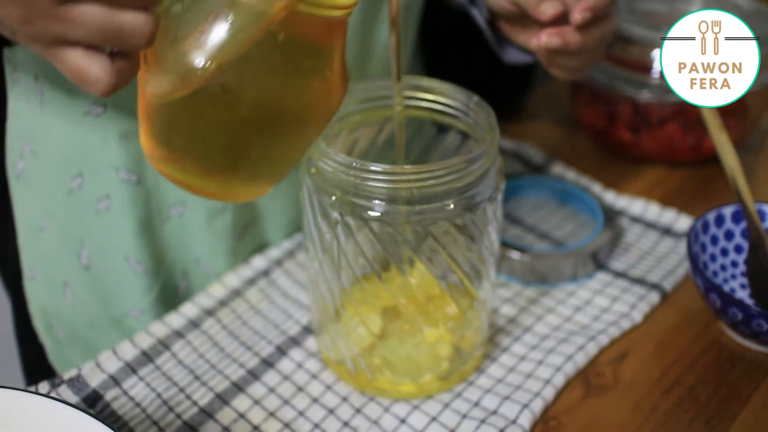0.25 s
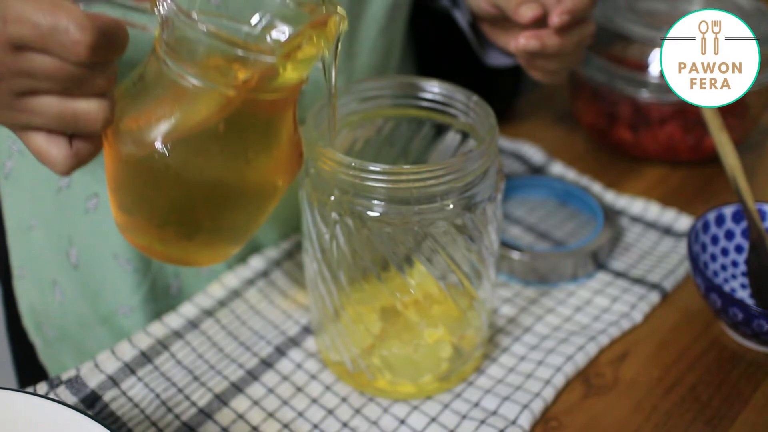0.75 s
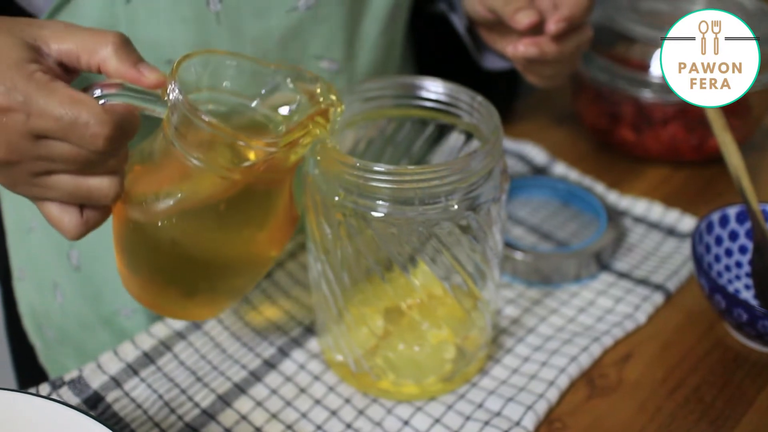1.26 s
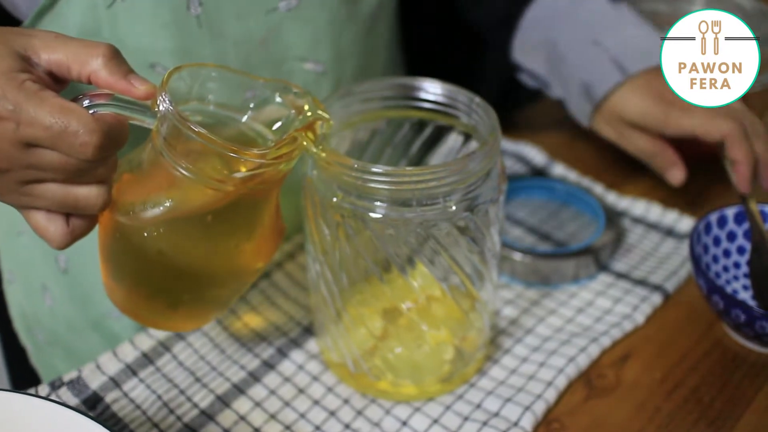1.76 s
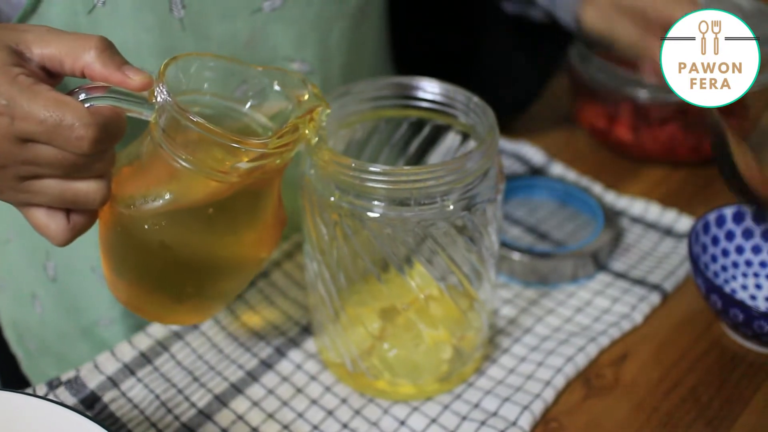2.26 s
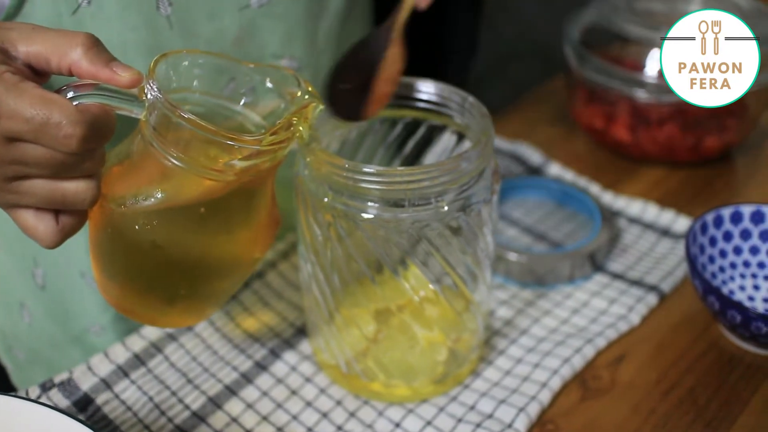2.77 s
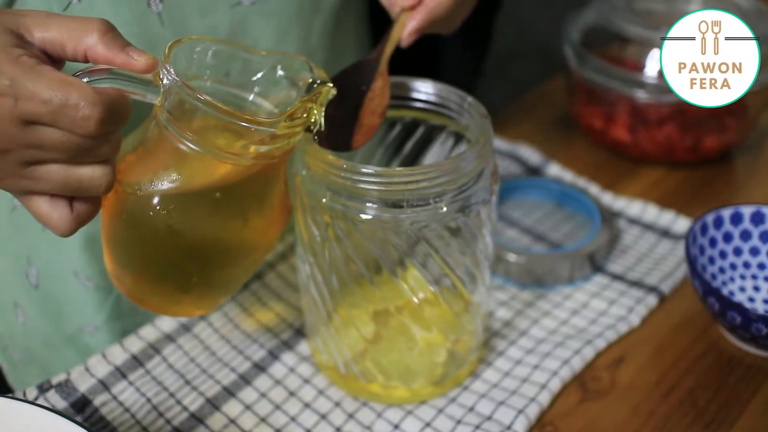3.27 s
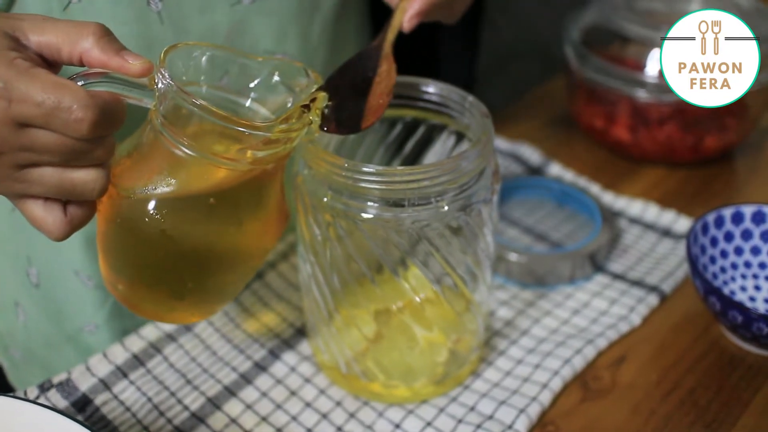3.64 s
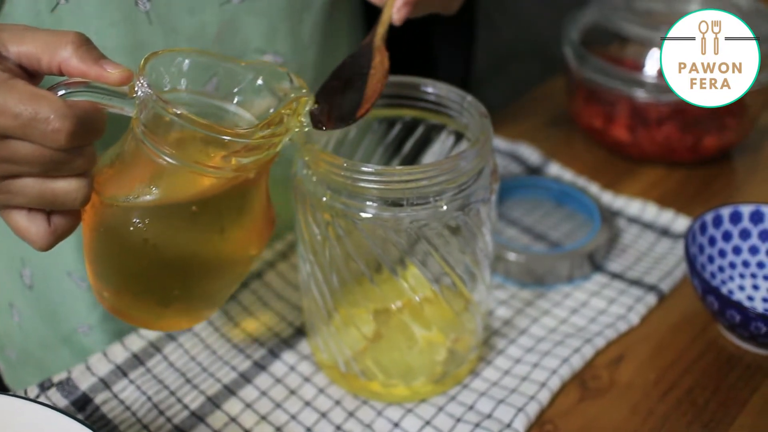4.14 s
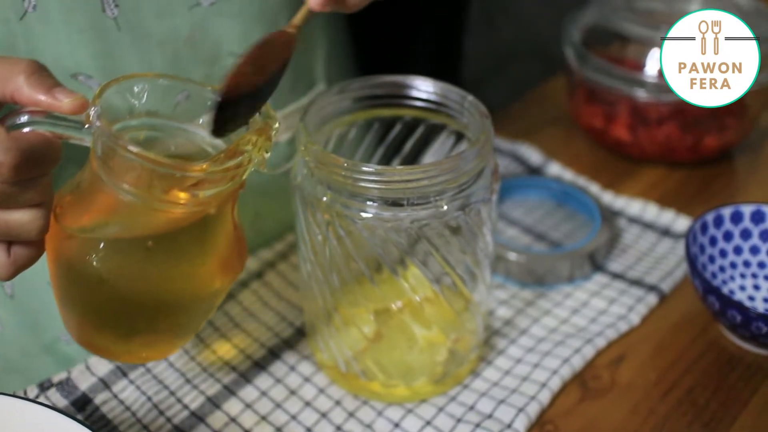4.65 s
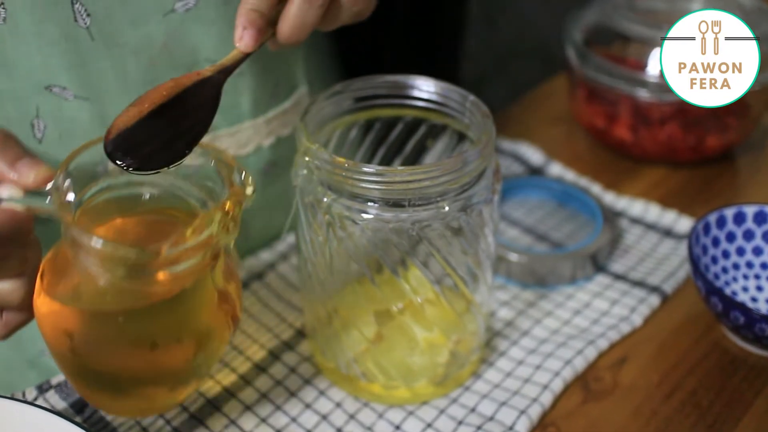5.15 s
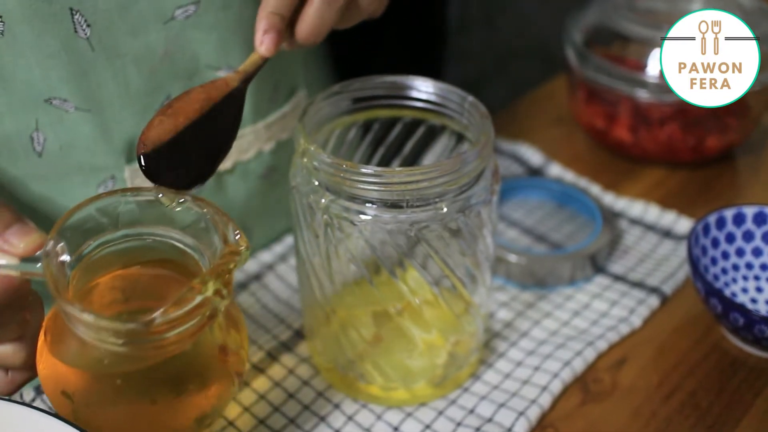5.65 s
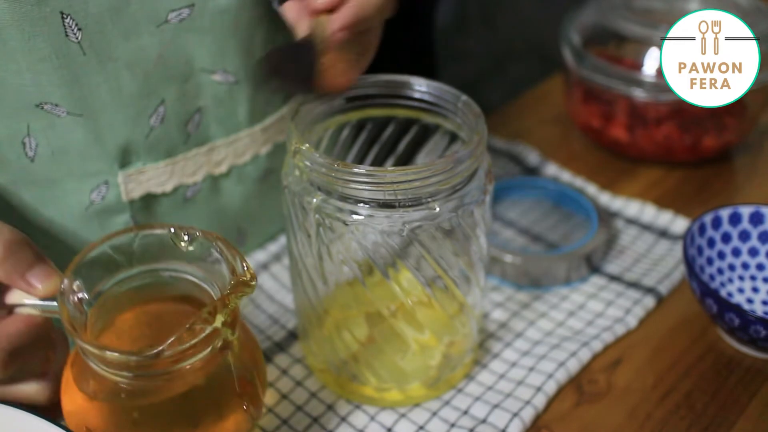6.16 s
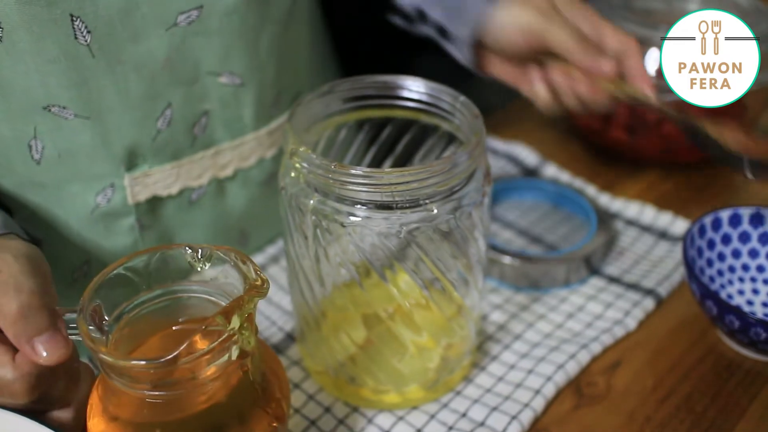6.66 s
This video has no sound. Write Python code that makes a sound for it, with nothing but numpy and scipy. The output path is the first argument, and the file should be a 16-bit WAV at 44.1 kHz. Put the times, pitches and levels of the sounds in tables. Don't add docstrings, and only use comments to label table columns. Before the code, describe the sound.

A glass jug clinks several times on a glass jar's rim, then a wooden spoon taps bowl, jar and lip in a quietly humming kitchen.

```python
import sys
import numpy as np
from scipy import signal
from scipy.fft import rfft, irfft
from scipy.io import wavfile

SR = 44100
rng = np.random.default_rng(int(sys.argv[2]) if len(sys.argv) > 2 else 0)


def unload_audio(sound):
    columns = np.transpose(np.atleast_2d(sound))
    steps = np.round(np.clip(columns, -1, 1) * 32767)
    wavfile.write(sys.argv[1], SR, steps.astype(np.int16))


def invert_db(level):
    return 10 ** (np.asarray(level, dtype=float) / 20)


N = 304730
T = np.arange(N) / SR

# start_s, crack_db, table_db, jar_air_db, jar_wall_db
JUG_KNOCKS = [
    (0.2754, -21, -46, -36.5, -53.5),
    (0.354, -33, -53, -47, -69),
    (0.46, -23.5, -38, -34, -65),
    (0.9372, -16, -50, -38.5, -38.5),
    (.949, -20.5, -57, -44.5, -58),
    (1.253, -25, -51, -41, -61.5),
    (1.536, -33, -82, -55, -76),
]
# pitch_hz, level_db, t60_s
TABLE_MODES = [(248.3, -4, 0.52), (352, -13, 0.57), (251.7, -11.5, 0.65), (318, -15, 0.024)]
# pitch_hz, level_db, t60_s
JAR_AIR_MODES = [(438.6, 1.5, 0.17), (382, -7.5, 0.22), (547, -23.5, 0.45), (613, -10, 0.11),
                 (376, -7, 0.12)]
# pitch_hz, level_db, t60_s
JAR_WALL_MODES = [(3266, 3, .26), (3290, 2, .09), (4588, -5, .15), (5571, -3, .27), (5603, -8, .24),
                  (5537, -8, .16), (2030, -2, .2), (4030, -8, .1), (6476, -14, .15), (2120, -4, .08),
                  (2400, -8, .05)]
# pitch_hz, level_db, t60_s
JUG_WALL_MODES = [(2110, -0.5, .08), (2370, -12, 0.054), (2770, -12, 0.065), (4590, -7.5, 0.12),
                  (5595, -15, .14), (6040, -26, 0.072)]
# pitch_hz, level_db per Hz
KNOCK_COLOUR = [(88, -23), (150, -15), (525, -2), (1280, -12.5), (1910, -3), (2740, -19), (3250, -14.5),
                (3850, -22.5), (4400, -12.5), (5020, -20), (5630, -15.5), (7070, -23), (14000, -46.5)]

RIM_BLOWS = [
    (.27532, -32, -23, -43, -63),
    (.35474, -45, -43, -145, -97),
    (.46126, -39, -32, 79, -123),
    (.93637, -29, -29, -94, -20),
    (.9492, -27, -28, 77, 141),
    (1.2522, -47, -37, 55, -42),
    (1.53674, -66, -60, -108, -144),
    (2.47101, -36.5, -46, 50, 15),
    (2.83785, -48, -62, 86, -165),
]
# pitch_hz, t60_s
RIM_TWINS = [(1775.5, .44), (1784.3, .354), (1803.3, .204), (1822, .144)]
# pitch_hz, t60_s
FREE_JAR_TWINS = [(1770.6, .4), (1785.2, .36)]

# start_s, crack_db, ring_db
BOWL_BLOWS = [
    (2.0252, -16, -38.5),
]
# pitch_hz, level_db, t60_s
BOWL_MODES = [(1567, -9, .6), (1581, -10, .45), (3009, 0, .64), (5013.6, -9, .36), (7504, -7, .09),
              (4200, -12, .15), (5890, -20, .3), (253, -14, .35), (668, -5, .18), (546, -12, .3),
              (572, -11, .3), (1107, -9, .18), (915, -14, .3), (1290, -12, .2)]
# pitch_hz, level_db per Hz
BOWL_COLOUR = [(88, -49), (150, -8.5), (1330, 7.5), (1800, 1), (2400, -15), (3010, -4.5), (4230, 1.5),
               (5420, -22), (5850, -4), (6940, -17), (7630, -6.5), (10100, -23), (14000, -44)]

# start_s, crack_db, ring_db
HARD_TAPS = [
    (2.4708, -10.5, -34.5),
]
# start_s, crack_db, ring_db
SOFT_TAPS = [
    (2.8380, -23.5, -56),
]
# pitch_hz, level_db, t60_s
TAP_MODES = [(4564, 0, .12), (4594, -6, .11), (4516, -11, .16), (6842, -8, .25), (6805, -11, .15),
             (5534, -16, .2), (3500, -8, .1), (3800, -8, .12), (7250, -8, .1)]
# pitch_hz, level_db per Hz
HARD_TAP_COLOUR = [(120, -85), (200, -19.5), (1330, -8), (1880, -7), (2600, -21.5), (3300, 0), (4410, 0.5),
                   (4750, -9), (5110, -19), (7090, 2.5), (8500, -10), (10000, -27), (11800, -25),
                   (15500, -51)]
# pitch_hz, level_db per Hz
SOFT_TAP_COLOUR = [(120, -53), (200, -9), (1670, -1.5), (2700, -14), (3050, -13), (3320, 7.5), (3740, -7),
                   (4370, 1.5), (6050, -10), (7560, -9), (10100, -43), (12000, -32), (15600, -62),
                   (22000, -120)]

# start_s, crack_db, ring_db
LIP_BLOWS = [
    (4.8883, -23.5, -30),
    (5.08, -53, -53),
]
# pitch_hz, level_db, t60_s
SPOON_MODES = [(1220, 2.5, 0.013), (1970, -15, 0.0081), (1260, -36, 0.45), (1420, -30, .12),
               (1130, -30, .2), (4270, -14, 0.0047)]
# pitch_hz, level_db per Hz
LIP_COLOUR = [(180, -39), (300, -40), (1220, -2), (3380, -25), (4400, -19.5), (5130, -35), (6470, -30),
              (12000, -44), (15600, -73), (22000, -120)]

# start_s, crack_db, ring_db
DISH_BLOWS = [
    (5.7197, -18.5, -36.5),
    (5.7475, -31, -74),
]
# pitch_hz, level_db, t60_s
DISH_MODES = [(1434, -1, .38), (1441, -2, .25), (2537, 1, .2), (2552, -7, .17), (3892, 3, .16),
              (5444, -11, .2), (7241, -18, .1), (106, -14, .3), (187, -8, .46), (207, -5, .24),
              (236, -2, .12), (267, -5, .13), (609, -2, .2), (623, -4, .15), (960, -2, .04),
              (8880, -14, .05)]
# pitch_hz, level_db per Hz
DISH_COLOUR = [(59, -45), (100, -3), (819, 8.5), (2060, -2), (2620, 4), (3260, -10), (3910, -9),
               (4500, -40), (5390, -8.5), (8200, -17), (8890, -16), (12000, -32), (15600, -74),
               (22000, -120)]

# start_s, level_db, pitch_hz, t60_s
TABLE_THUMPS = [
    (0.501, -57, 57, 0.44),
    (.94, -51, 63.6, 0.46),
    (2.70, -57, 60, 0.24),
    (6.44, -55.5, 53.6, 0.48),
]
# pitch_hz, t60_s
ECHO_T60 = [(100, 0.38), (500, 0.34), (2000, 0.31), (6000, 0.34), (12000, 0.27)]
# peak_s, level_db, time to fade by 20 dB fade_s (negative = still growing)
MOTOR_SURGES = [(.03, -60, 0.1), (.17, -57, .5), (.5, -68, 0.4), (.82, -60, 0.27), (1.22, -58.5, .5),
                (1.45, -67, 0.1), (1.7, -73, 1), (2.35, -63, 0), (2.55, -63.5, .5), (2.72, -69.5, .5),
                (3.12, -69.5, 0.6), (3.48, -67, .5), (4.06, -58, 0.46), (4.52, -67.5, 0.8),
                (4.97, -66, 0.05), (5.33, -70, 0.4), (6.83, -66.5, -4)]
# pitch_hz, level_db per Hz
HISS_MID_COLOUR = [(12, -25), (20, -0.5), (55, -2), (76, -5), (104, -2), (186, -9), (290, -8.5),
                   (394, -11.5), (688, -11.5), (1050, -14), (2930, -16.5), (14300, -17.5), (15600, -19)]
# pitch_hz, level_db per Hz
HISS_SIDE_COLOUR = [(12, -41), (20, 1), (106, -0.5), (728, -3), (1310, -3.5), (1590, -3.5), (2220, -3.5),
                    (2850, -3), (15600, -5)]

RING_TO_ROOM_DB = -13.5


def rms_one(x):
    return x / np.sqrt(np.mean(x ** 2) + 1e-20)


def at_hz(points, hz):
    table_hz, values = np.array(points)[:, 0], np.array(points)[:, 1]
    return np.interp(np.log(hz + 1), np.log(table_hz), values)


def ring(times, levels_db, modes):
    clicks, out = np.full(N, 1e-18), 0
    clicks[np.round(np.array(times) * SR).astype(int)] = invert_db(np.array(levels_db))
    for k, (pitch_hz, level_db, t60_s) in enumerate(modes):
        decay = invert_db(-60 / (t60_s * SR))
        turn = 2 * np.pi * pitch_hz / SR
        strike = [0, invert_db(level_db) * np.sin(turn)]
        resonance = [1, -2 * decay * np.cos(turn), decay * decay]
        out = out + (-1) ** k * signal.lfilter(strike, resonance, clicks)
    return out


def cracks(times, levels_db, colour, firm, spread_s):
    size = 2048
    out, t, bins = np.zeros(N), T[:size], np.arange(size // 2 + 1)
    cepstrum = irfft(np.log(invert_db(at_hz(colour, bins * SR / size))))
    cepstrum[1:size // 2] *= 2
    pulse = rfft(irfft(np.exp(rfft(cepstrum[:size // 2 + 1], size))))
    pulse /= abs(irfft(pulse)).max()
    g = np.clip(firm, 0.72, 0.95)
    give = 1 - np.exp(-t / 0.000067)
    for start_s, level_db in zip(times, levels_db):
        lags = np.round(spread_s * SR * rng.uniform(0.2, 1, (3, 1)))
        delay = np.exp(-2j * np.pi * lags * bins / size)
        scatter = np.prod((g - delay) / (1 - g * delay), axis=0)
        i = round(start_s * SR)
        out[i:i + size] += invert_db(level_db) * irfft(pulse * scatter) * give
    return out


def struck(blows, modes, colour, firm, spread_s, wet_db):
    start_s, crack_db, ring_db = np.transpose(blows)
    crack = cracks(start_s, crack_db, colour, firm, spread_s)
    body = ring(start_s, ring_db, modes)
    return crack + body, invert_db(wet_db) * crack + invert_db(RING_TO_ROOM_DB) * body


def jug_on_jar():
    start_s, crack_db, table_db, air_db, wall_db = np.transpose(JUG_KNOCKS)
    body = ring(start_s, table_db, TABLE_MODES)
    body = body + ring(start_s, air_db, JAR_AIR_MODES)
    body = body + ring(start_s, wall_db, JAR_WALL_MODES)
    body = body + ring(start_s, air_db - 8, JUG_WALL_MODES)
    crack = cracks(start_s, crack_db, KNOCK_COLOUR, firm=0.78, spread_s=0.0012)
    return crack + body, invert_db(-4.5) * crack + invert_db(RING_TO_ROOM_DB) * body


def glass_rims():
    jug_off_s, swell_s = 2, 0.0015
    out, t = np.zeros(N), T[:SR // 2]
    swell = 1 - np.exp(-t / swell_s)
    for start_s, jar_db, jug_db, jar_deg, jug_deg in RIM_BLOWS:
        modes = RIM_TWINS if start_s < jug_off_s else [*FREE_JAR_TWINS, *RIM_TWINS[2:]]
        twins = np.array([invert_db(-60 * t / t60_s) * np.sin(2 * np.pi * hz * t) for hz, t60_s in modes])
        jar = invert_db(jar_db) * np.exp(1j * np.radians(jar_deg))
        jug = invert_db(jug_db) * np.exp(1j * np.radians(jug_deg))
        shares = np.array([jar.real, jar.imag, jug.real, jug.imag])
        i = round(start_s * SR)
        out[i:i + len(t)] += shares @ twins * swell
    return out


def spoon_leaves_bowl():
    return struck(BOWL_BLOWS, BOWL_MODES, BOWL_COLOUR, firm=0.77, spread_s=0.001, wet_db=-6.5)


def spoon_taps_jar_hard():
    return struck(HARD_TAPS, TAP_MODES, HARD_TAP_COLOUR, firm=0.8, spread_s=0.0012, wet_db=-10.5)


def spoon_taps_jar_lightly():
    return struck(SOFT_TAPS, TAP_MODES, SOFT_TAP_COLOUR, firm=0.62, spread_s=0.0008, wet_db=-15)


def spoon_on_lip():
    return struck(LIP_BLOWS, SPOON_MODES, LIP_COLOUR, firm=0.93, spread_s=0.0005, wet_db=-18)


def dish_set_down():
    return struck(DISH_BLOWS, DISH_MODES, DISH_COLOUR, firm=0.62, spread_s=0.0011, wet_db=-6.5)


def table_thumps():
    return sum(ring([start_s], [level_db], [(pitch_hz, 0, t60_s)])
               for start_s, level_db, pitch_hz, t60_s in TABLE_THUMPS)


def kitchen(x):
    first_echo_s = 0.0052
    t, out = T[:SR * 3 // 4], 0
    onset = np.clip((t - first_echo_s) / 0.0012, 0, 1)
    for low_hz in 60 * 2. ** np.arange(8):
        white = rng.standard_normal((2, len(t))) * onset
        octave = signal.butter(2, [low_hz, 2 * low_hz], "band", fs=SR, output="sos")
        band = signal.sosfilt(octave, white)
        out = out + band * invert_db(-60 * t / at_hz(ECHO_T60, 0.66 * low_hz))
    out = out / np.sqrt(np.sum(out[0] ** 2))
    return signal.fftconvolve(x[None], out, axes=1)[:, :N]


def motor_hum():
    motor_hz, rise_s, waver_hz, waver_rad = 98.8, 0.13, 3.2, 0.8
    peak_s, level_db, fade_s = np.transpose(MOTOR_SURGES)[:, :, None]
    t = T[::64]
    drop = np.maximum((peak_s - t) / rise_s, (t - peak_s) / fade_s)
    level = np.sum(invert_db(level_db - 20 * drop), axis=0)
    slow = signal.butter(2, waver_hz, fs=SR / 64, output="sos")
    waver = rms_one(signal.sosfilt(slow, rng.standard_normal(len(t))))
    phase = 2 * np.pi * motor_hz * T + waver_rad * np.interp(T, t, waver)
    return np.sqrt(2) * np.interp(T, t, level) * np.sin(phase)


def hiss(colour):
    hz = np.arange(N // 2 + 1) * SR / N
    gain = invert_db(at_hz(colour, np.minimum(hz, 15000))) * (hz < 15770)
    return rms_one(irfft(rfft(rng.standard_normal(N)) * gain, N))


def scene():
    direct, sent = np.sum([jug_on_jar(), spoon_leaves_bowl(), spoon_taps_jar_hard(),
                           spoon_taps_jar_lightly(), spoon_on_lip(), dish_set_down()], axis=0)
    rims = glass_rims()
    echo, echo_side = kitchen(sent + invert_db(-18) * rims)
    mid = direct + rims + echo + table_thumps() + motor_hum() + invert_db(-59.5) * hiss(HISS_MID_COLOUR)
    side = invert_db(-43) * echo_side + invert_db(-63) * hiss(HISS_SIDE_COLOUR)
    return np.array([mid + side, mid - side])


def roll_off(x):
    return signal.sosfilt(signal.butter(12, 16910, fs=SR, output="sos"), x)


def record(dry):
    return roll_off(dry)


dry = scene()
out = record(dry)
unload_audio(out)
```